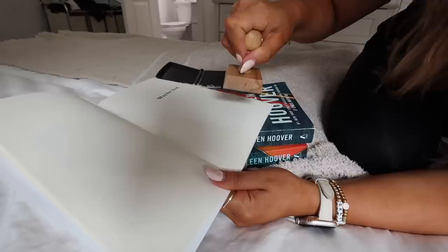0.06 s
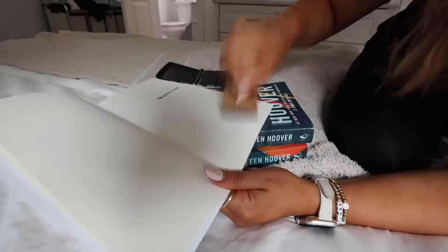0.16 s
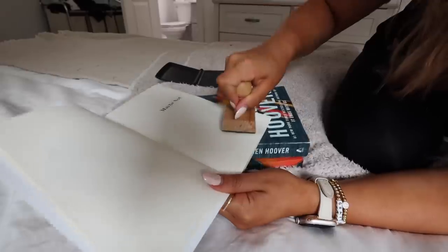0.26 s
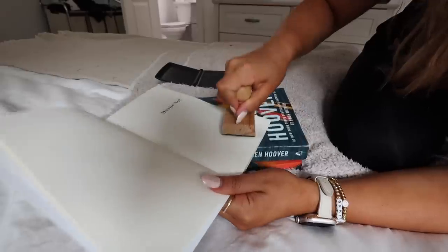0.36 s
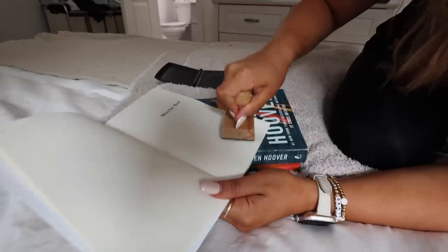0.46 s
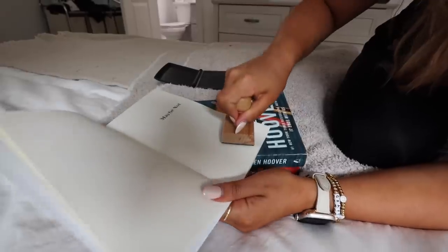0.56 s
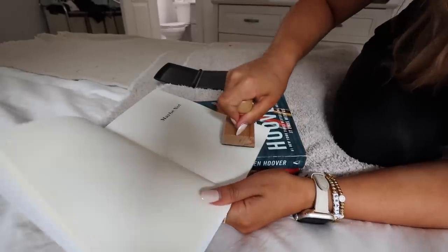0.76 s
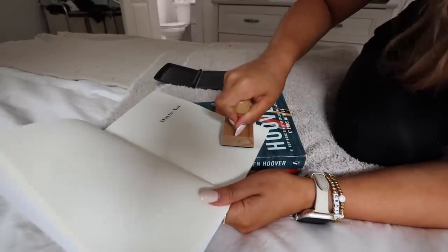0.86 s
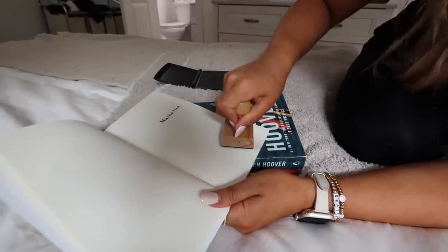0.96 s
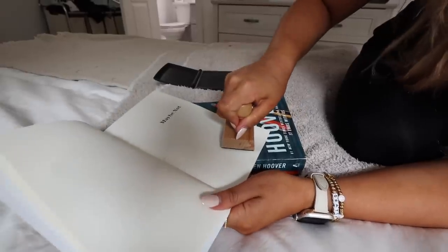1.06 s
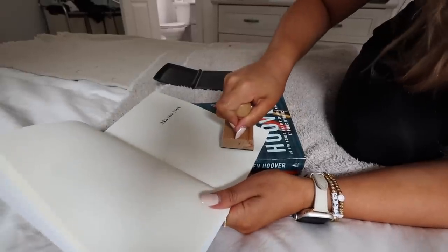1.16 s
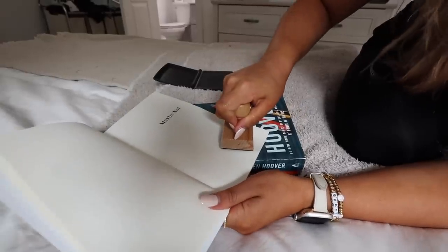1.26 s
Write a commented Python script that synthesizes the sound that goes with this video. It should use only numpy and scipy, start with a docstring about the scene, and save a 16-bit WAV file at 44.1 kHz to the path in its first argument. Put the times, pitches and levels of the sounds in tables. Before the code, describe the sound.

One crisp wooden knock with a quick soft rebound, followed by light page crackle in a bedroom

```python
"""A wooden hand stamp knocks on a book lying on a bed, with one softer rebound, close to a phone in a small bedroom.
The knock rings stamp and book as sets of fading tones, adds a crack of noise and thuds the stack into the bedding.
Later the page rustles (random crackles) and ticks (short ringing pulses) under the stamp, with faint narrow rubs.
An appliance hums: mains tones beat with a slightly slower motor, over the filtered noise of the house air."""
import sys
import numpy as np
from scipy import signal
from scipy.fft import rfft, irfft
from scipy.io import wavfile
from scipy.ndimage import uniform_filter1d

SR = 44100
rng = np.random.default_rng(int(sys.argv[2]) if len(sys.argv) > 2 else 0)


def pcm_store(signal):
    """Save signal as 16-bit PCM."""
    levels = np.round(np.clip(np.atleast_2d(signal), -1, 1) * 32767)
    wavfile.write(sys.argv[1], SR, levels.astype(np.int16).T)


def field_ratio(decibels):
    """Amplitude ratio for a level in dB (20 dB per decade); scalars and array-likes work."""
    return 10 ** (np.asarray(decibels, dtype=float) / 20)


N = 57330  # samples, 1.3 s

# House air noise. Each row: frequency in Hz, relative density in dB per Hz.
AIR_SPECTRUM = [(20, -26), (35, 4), (60, 3), (100, 6), (200, 2), (400, -6.5), (650, -6), (1000, -13),
                (2000, -15.5), (3300, -18), (4200, -22.5), (6300, -31), (10000, -41), (13000, -45),
                (16000, -95)]
# Hum of the appliance at 1, 2, 3, .. times the mains frequency. Each entry: rms level in dB.
HUM_LEVELS = [-53, -52.5, -54.5, -63.5, -64.5, -82]
# Bedroom echo in bands. Each row: centre in Hz, strength in dB, time to fade by 60 dB in seconds.
ROOM_BANDS = [(158, -28, 0.41), (314, -3, 0.17), (635, -8.5, 0.27), (1210, -2, 0.24), (2160, -10.5, 0.23),
              (4070, 2, 0.31), (8040, -33, .1)]
# Loudness of the page rustle over time. Each row: time in seconds, rms level in dB.
RUSTLE_LEVELS = [(0, -93), (0.399, -59.5), (.5, -64.5), (.57, -54.5), (.66, -56.5), (.7, -64), (.95, -61.5),
                 (1.1, -67.5), (1.3, -84)]
# Tone colour of rustling paper. Each row: frequency in Hz, relative density in dB per Hz.
PAPER_SPECTRUM = [(300, -41), (700, 5), (1300, 8.5), (2000, 8), (3200, 1.5), (4500, -18.5), (8000, -11),
                  (12000, -47.5)]
# Page ticks under the stamp. Each row: start in seconds, strength in dB.
TICKS_AT = [(.5795, -41), (.631, -51), (.651, -41.5), (.682, -48)]
# Tones of the ticking page. Each row: frequency in Hz, strength in dB, time to fade by 60 dB in seconds.
PAGE_MODES = [(767, 1.5, 0.02), (1876, -0.5, 0.034), (2760, -5, 0.018), (6500, -13, .006),
              (9000, -22, 0.0042)]
# Faint narrow rubs. Each row: middle in seconds, length in seconds, frequency in Hz, level in dB.
RUBS_AT = [(.525, 0.043, 1318, -57.5), (0.966, 0.077, 1300, -67), (1.124, 0.017, 2603, -60.5)]
# Book stack on the bedding. Each row: frequency in Hz, strength in dB, time to fade by 60 dB in seconds.
THUD_MODES = [(111.3, -14, 0.15), (145.7, -11, 0.16), (199.4, -13.5, 0.18)]
# The knock and its rebound. Each row: start in seconds, strength in dB, time scale of contact in ms.
KNOCKS_AT = [(0.2243, 0, 0.27), (0.2464, -9.5, 0.49)]
# Tones of the book. Each row: frequency in Hz, strength in dB, time to fade by 60 dB in seconds.
BOOK_MODES = [(297, -36, .03), (435, -26, 0.02), (497, -7.5, 0.033), (612, -6.5, 0.022), (674, -3, 0.036),
              (827, -10.5, 0.025), (925, -12, 0.047), (1089, -24, 0.028)]
# Tones of the wooden stamp. Each row: frequency in Hz, strength in dB, time to fade by 60 dB in seconds.
STAMP_MODES = [(1456, -13, 0.03), (1628, -3, 0.023), (2013, -8, 0.022), (2435, -5.5, 0.013),
               (2730, -8, 0.015), (3560, -35, 0.012), (4550, -27, 0.025)]

AIR_DB, AIR_WIDE_HZ = -50.5, 480  # left and right differ above this frequency
MAINS_HZ, MOTOR_HZ, MOTOR_DB = 60, 58, -47
BEAT_LOUD_S = 0.69  # mains and motor swing together at this time
ROOM_BUILD_S, ROOM_WIDE_HZ = 0.0029, 1300
RUSTLE_PER_S = 640  # average number of crackles
RUB_HALF_WIDTH_HZ = 81
THUD_PUSH_S = 0.0015  # time scale of the push into the bed
CRACK_DB, CRACK_T60_S = -24, 0.0032  # start level before the tone filter, time to fade by 60 dB
OPPOSED = -1  # neighbouring modes swing in opposite senses
BASS_CUT_HZ = 75  # small objects radiate little below this
LEFT_DB, LEFT_HZ = 2.8, 300  # lead of the left side, and the corner above which it grows
LEFT_LAG_MS = 0.045  # the left port hears near sounds this much later


def read(points, hz):
    """Gain at hz, read from (Hz, dB) points joined along a log frequency axis."""
    table_hz, table_db = np.array(points, float).T
    return field_ratio(np.interp(np.log(hz + 1), np.log(table_hz), table_db))


def shape(x, gain):
    """Filter a sound by a gain that is a function of frequency."""
    n = x.shape[-1]
    return irfft(rfft(x) * gain(np.arange(n // 2 + 1) * SR / n), n)


def wide(hz, edge_hz):
    """A curve rising from 0 in the bass to 1 in the treble, half way up at edge_hz."""
    return hz ** 2 / (hz ** 2 + edge_hz ** 2)


def diffuse(n, edge_hz):
    """Stereo noise from all around: alike in the bass, unrelated in the treble."""
    mid, side = rng.standard_normal((2, n))
    side = shape(side, lambda hz: wide(hz, edge_hz))
    return np.array([mid + side, mid - side])


def walk(rate):
    """Slow random wander, with rate fresh values a second smoothed together."""
    k = int(SR / rate)
    stairs = np.repeat(rng.standard_normal(N // k + 1), k)
    return 0.43 * uniform_filter1d(uniform_filter1d(stairs, k), k)[:N]


def ring(modes, turn=1):
    """Answer of a body to a sharp tap: fading tones; turn sets the sense of each against the last."""
    t = np.arange(SR // 2) / SR
    out = 0
    for k, (hz, db, t60) in enumerate(modes):
        out = out + turn ** k * field_ratio(db - 60 * t / t60) * np.sin(2 * np.pi * hz * t)
    return out


def push(at, db, length):
    """A smooth push whose area is set by db; the force peaks a quarter of length after its start."""
    u = (np.arange(N) / SR - at) / length
    force = np.where(u > 0, u * np.exp(-np.clip(u, 0, 99) * 4), 0)
    return field_ratio(db) * force / force.sum()


def air():
    """House air: smooth wide noise whose bass wavers slowly."""
    x = shape(diffuse(N, AIR_WIDE_HZ), lambda hz: read(AIR_SPECTRUM, hz))
    bass = shape(x, lambda hz: 1 / (1 + (hz / 250) ** 2))
    wavering = x - bass + bass * field_ratio(1.3 * walk(6))
    return wavering / x.std() * field_ratio(AIR_DB)


def appliance():
    """Mains tones with wandering levels, and a motor tone that beats against the lowest."""
    t = np.arange(N) / SR - BEAT_LOUD_S
    start = 2 * np.pi * rng.random(len(HUM_LEVELS))
    hum = 0
    for k, db in enumerate(HUM_LEVELS):
        hum = hum + field_ratio(db + walk(7.5)) * np.cos(2 * np.pi * MAINS_HZ * (k + 1) * t + start[k])
    motor = field_ratio(MOTOR_DB + 0.27 * walk(12)) * np.cos(2 * np.pi * MOTOR_HZ * t + start[0])
    return np.sqrt(2) * (hum + motor)  # root 2 turns rms into peak


def bedroom():
    """Stereo echo of the room: bands of noise that build up quickly and die away."""
    n = SR // 2
    t = np.arange(n) / SR
    noise = diffuse(n, ROOM_WIDE_HZ)
    out = 0
    for hz, db, t60 in ROOM_BANDS:
        band = shape(noise, lambda f: np.exp(-(np.log2((f + 1) / hz) / 0.39) ** 2))
        # the root evens out the energy of long and short decays
        out = out + band * field_ratio(db - 60 * t / t60) / np.sqrt(t60 * SR / 14)
    return out * (1 - np.exp(-t / ROOM_BUILD_S))


def page():
    """Tiny uneven crackles of paper under the pressing stamp, over a little steady noise."""
    chance = rng.random((2, N))
    happens = chance[0] < RUSTLE_PER_S / SR
    size = field_ratio(-3.0 * np.log(chance[1] + 0.02))  # a few crackles are much larger
    grains = happens * size * rng.choice([-1, 1], N)
    x = shape(grains + 0.21 * rng.standard_normal(N), lambda hz: read(PAPER_SPECTRUM, hz))
    level = np.interp(np.arange(N) / SR, *np.array(RUSTLE_LEVELS).T)
    return x / x.std() * field_ratio(level)


def ticks():
    """Short pushes ring the page; rubs are narrow bands of noise that swell and fade."""
    t = np.arange(N) / SR
    pushes = sum(push(at, db, 0.00011) for at, db in TICKS_AT)
    out = signal.fftconvolve(pushes, ring(PAGE_MODES))[:N]
    for middle, length, hz, db in RUBS_AT:
        rub = shape(rng.standard_normal(N), lambda f: np.exp(-((f - hz) / RUB_HALF_WIDTH_HZ) ** 2))
        swell = np.exp(-((t - middle) / length * 2) ** 2)
        out = out + field_ratio(db) * rub / rub.std() * swell
    return out


def thud():
    """The knock drives the stack into the bed; its low modes swell together a moment later."""
    drive = push(KNOCKS_AT[0][0], 0, THUD_PUSH_S)
    return signal.fftconvolve(drive, ring(THUD_MODES, OPPOSED))[:N]


def stamp():
    """The knock and its softer rebound ring book and stamp; the knock also cracks."""
    body = ring(BOOK_MODES) - ring(STAMP_MODES, OPPOSED)
    pushes = sum(push(at, db, ms / 1000) for at, db, ms in KNOCKS_AT)
    wood = signal.fftconvolve(pushes, body)[:N]
    t = np.arange(N) / SR - KNOCKS_AT[0][0]
    fade = field_ratio(CRACK_DB - 60 * np.clip(t, 0, 1) / CRACK_T60_S) * (t > 0)
    colour = [(4000, -33), (7200, 11), (10000, 10.5), (14000, -30)]  # Hz, dB
    return wood + fade * shape(rng.standard_normal(N), lambda hz: read(colour, hz))


def to_port(x, side):
    """One port's share of a near sound (side 1 left, -1 right): left is later and brighter."""
    def tilt(hz):
        level = field_ratio(side * LEFT_DB / 2 * wide(hz, LEFT_HZ))
        delay = np.exp(-1j * side * np.pi * hz * LEFT_LAG_MS / 1000)  # half the lag each way
        return level * delay
    return shape(x, tilt)


def scene():
    """Near sounds reach both ports directly; room echo, hum and air surround them."""
    thin = signal.butter(3, BASS_CUT_HZ, "high", fs=SR, output="sos")
    near = signal.sosfilt(thin, stamp() + page() + ticks())
    with_thud = near + signal.sosfilt(thin, thud())
    direct = np.array([to_port(with_thud, side) for side in (1, -1)])
    echo = signal.fftconvolve(near[None], bedroom(), axes=1)[:, :N]  # the thud stays out of the echo
    return direct + echo + appliance() + air()


def band_limit(x):
    """A steep low-pass at the top of the band."""
    return signal.sosfilt(signal.butter(12, 15600, fs=SR, output="sos"), x)


def record(dry):
    """The sound fades in within 6.7 ms and its peaks clip at full scale."""
    fade_in = np.clip(np.arange(N) / SR / 0.0067, 0, 1)
    mix = np.clip(dry * fade_in, -1, 1)
    return band_limit(mix)


dry = scene()
out = record(dry)
pcm_store(out)
```